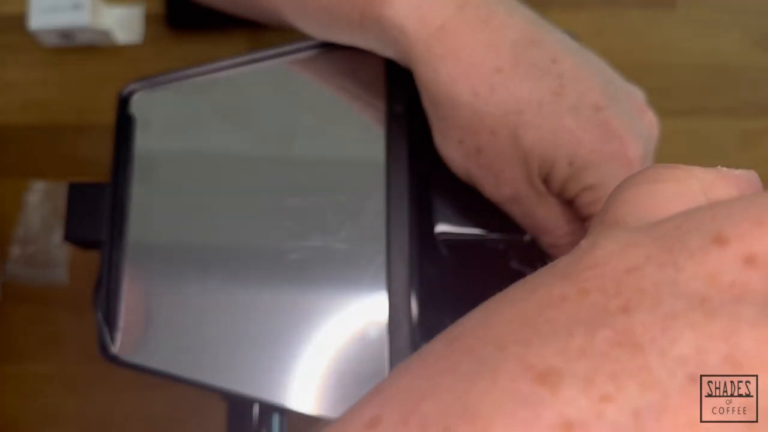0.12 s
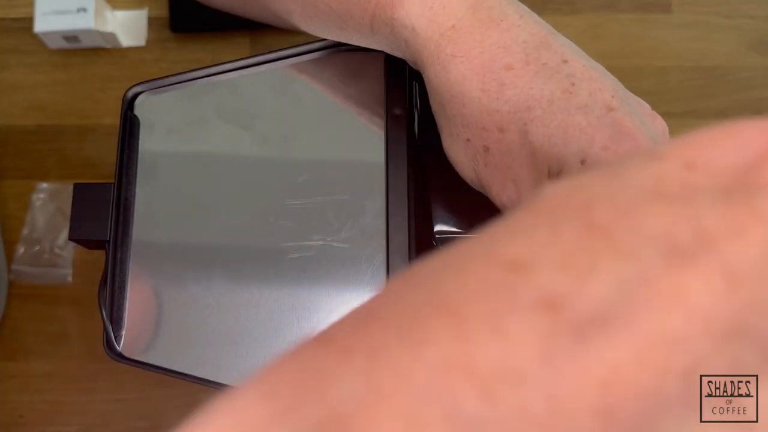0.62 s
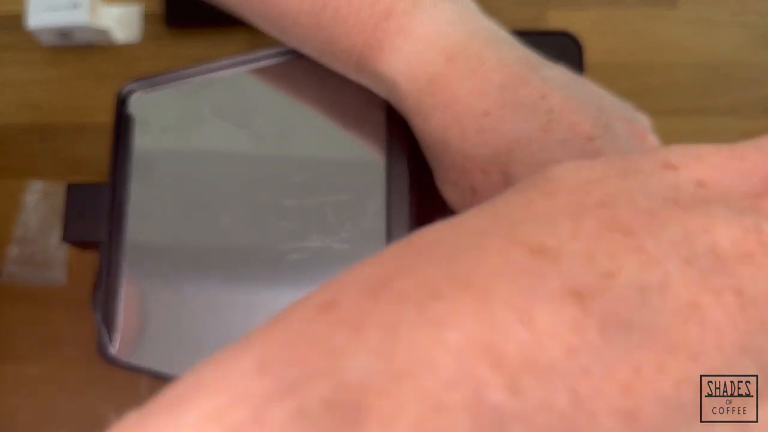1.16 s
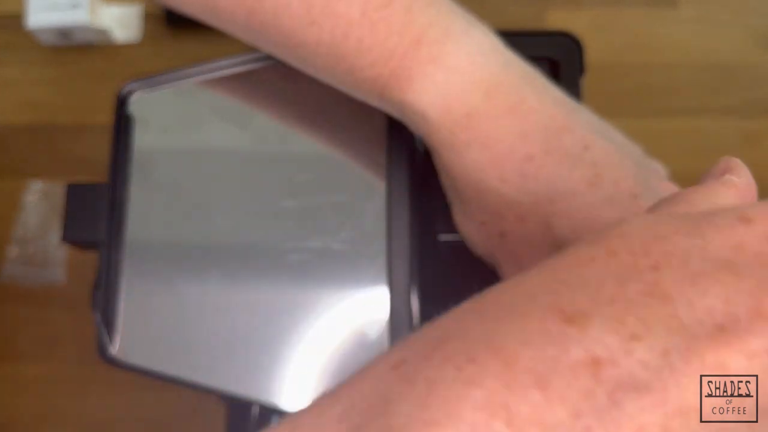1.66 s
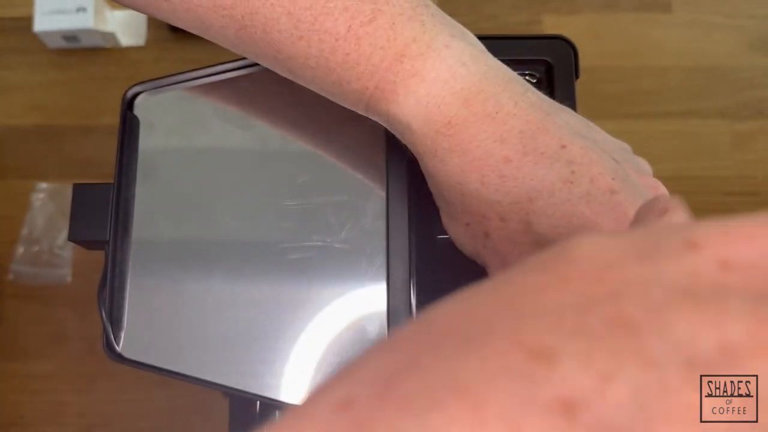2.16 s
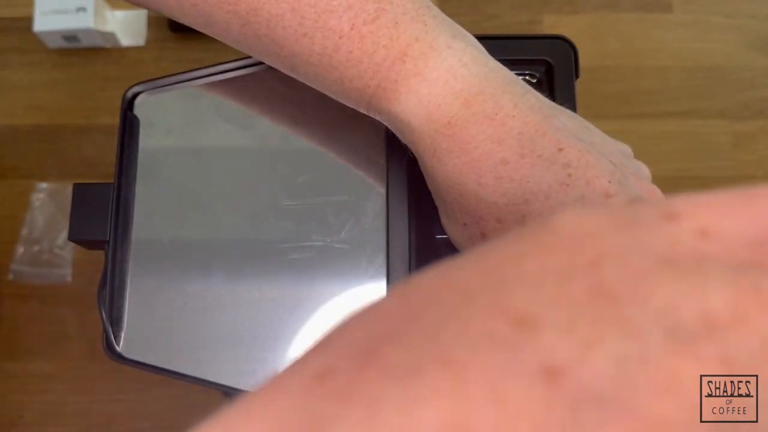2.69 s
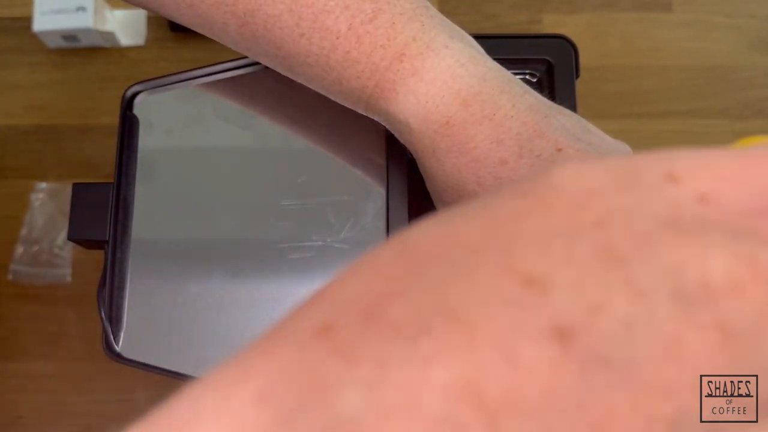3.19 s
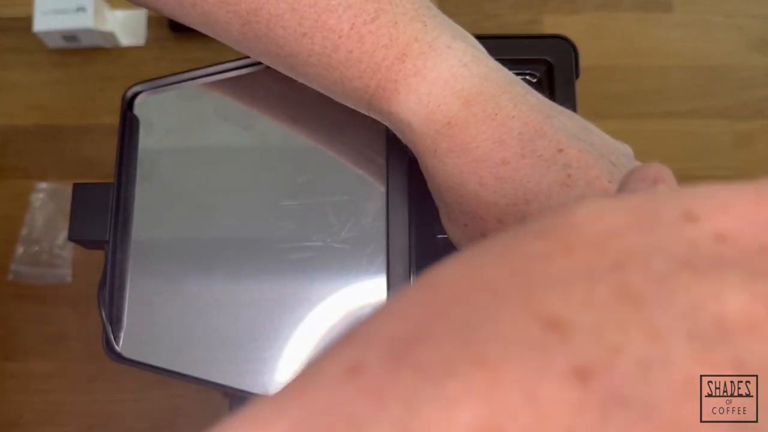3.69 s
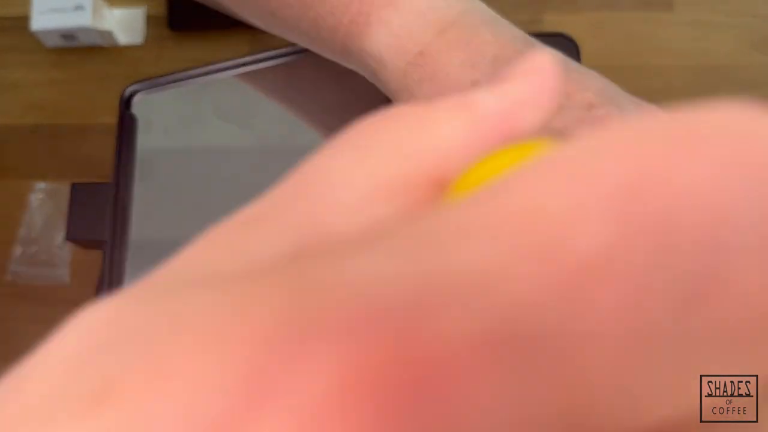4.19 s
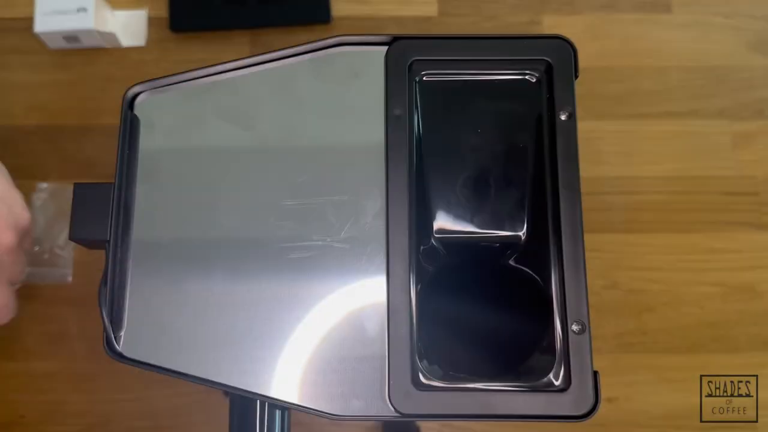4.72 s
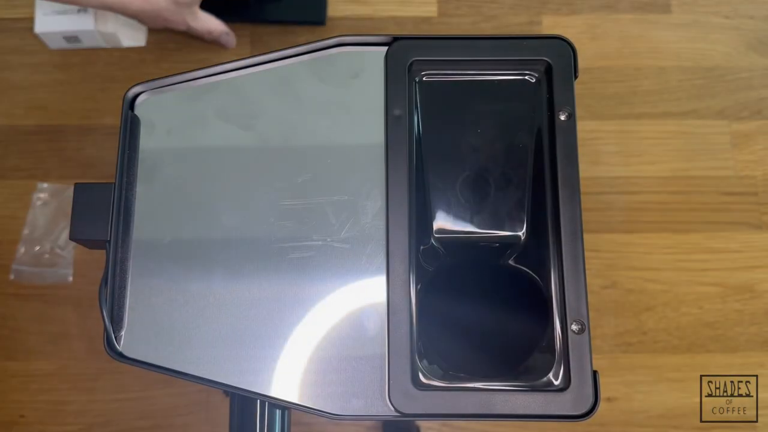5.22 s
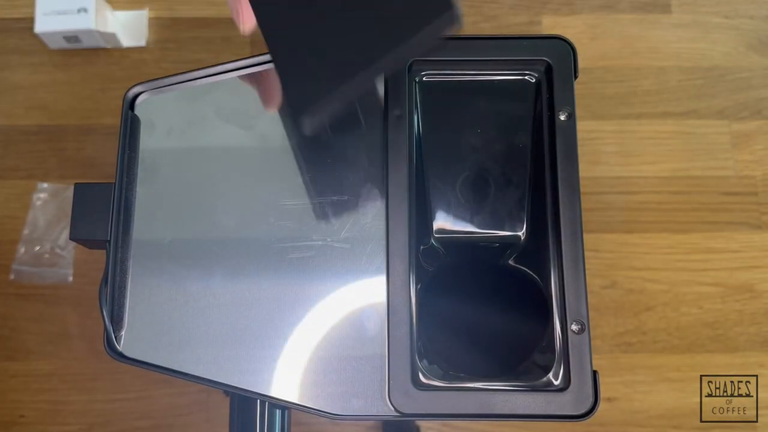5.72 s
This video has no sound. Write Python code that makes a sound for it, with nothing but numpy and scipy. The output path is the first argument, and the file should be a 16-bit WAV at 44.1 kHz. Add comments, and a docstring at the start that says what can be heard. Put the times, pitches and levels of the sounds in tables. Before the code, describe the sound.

Several sharp hollow metallic knocks, then soft rhythmic scraping of a screw being turned in a metal casing, ending with a loud knock and a tray clack.

```python
"""Hands turn a screwdriver inside a hollow metal casing: each twist is random clicks, coloured or ringing in metal.
The bit slips and knocks the casing: each knock is a tick of noise, fading tones and dying noise.
Fingers and cloth hiss as shaped noise, and the wooden table rumbles under arms and blows.
Near the end a plastic tray scrapes along, clacks and scrapes again, made of clicks and fading tones.
A small stereo microphone is close by; a small room rings after each sound, over quiet air noise."""
import sys
import numpy as np
from scipy import signal
from scipy.fft import rfft, irfft, next_fast_len
from scipy.io import wavfile

SR = 44100
rng = np.random.default_rng(int(sys.argv[2]) if len(sys.argv) > 2 else 0)


def convert_level_to_amplitude(level_db):
    """Map a level in decibels to its linear amplitude factor."""
    exponent = np.asarray(level_db, float) / 20
    return 10 ** exponent


def wav_record(signal):
    """Record a signal, one row per channel, as 16-bit PCM in the file named by sys.argv[1]."""
    frames = np.transpose(np.atleast_2d(signal))
    bounded = np.clip(frames, -1, 1)
    # unit amplitude maps onto the largest positive 16-bit level
    quanta = np.round(bounded * 32767).astype(np.int16)
    wavfile.write(sys.argv[1], SR, quanta)


N = 258406  # length [samples]


def evened(x):
    """Scales a sound to an rms of 1."""
    return x / np.sqrt(np.mean(x ** 2) + 1e-20)


def read(points, hz):
    """Reads a table between its points, on a log-frequency axis."""
    f, value = np.transpose(points)
    return np.interp(np.log(hz + 1), np.log(f + 1), value)


def curve(tables, column):
    """Gain over time from one dB column of tables joined end to end, silent before and after."""
    rows = np.vstack(tables)
    return convert_level_to_amplitude(np.interp(np.arange(N) / SR, rows[:, 0], rows[:, column], -140, -140))


def add(mix, s, sound):
    """Lays a sound into the mix at s seconds."""
    part = mix[round(s * SR):][:len(sound)]
    part += sound[:len(part)]


def coloured(x, spectrum):
    """Makes each frequency louder or softer, as a table says."""
    size = next_fast_len(len(x), True)
    gain = convert_level_to_amplitude(read(spectrum, np.fft.rfftfreq(size, 1 / SR)))
    return irfft(rfft(x, size) * gain, size)[:len(x)]


def ring(modes, rise_ms):
    """One blow: the object's tones swell during contact, then fade; the spot struck sets the mix; peak 1."""
    hz, db, t60 = np.transpose(modes)[:, :, None]
    t = np.arange(SR // 4) / SR
    spot, grip, turn = rng.standard_normal((3, len(modes), 1))
    hz = hz * (1 + .01 * grip)  # each blow is a little out of tune, as under a gripping hand
    db = db + 2 * spot
    tones = convert_level_to_amplitude(db - 60 * t / t60) * np.sin(2 * np.pi * (hz * t + 0.13 * turn))
    out = tones.sum(0) * (1 - np.exp(-(t * 1000 / rise_ms) ** 2))
    return out / abs(out).max()


def shudder(spectrum, t60, rise_ms):
    """Too many small tones to count: coloured noise that swells and dies away; peak 1."""
    t = np.arange(SR // 4) / SR
    out = coloured(rng.standard_normal(len(t)), spectrum)
    out *= convert_level_to_amplitude(-60 * t / t60) * (1 - np.exp(-(t * 1000 / rise_ms) ** 2))
    return out / abs(out).max()


def grit(per_s, spread_db):
    """Two surfaces stick and slip: random clicks of uneven size."""
    size = convert_level_to_amplitude(spread_db * np.minimum(rng.exponential(1, N), 4)) * rng.choice([-1, 1], N)
    return size * (rng.random(N) < per_s / SR)


def rubbed(modes, per_s, spread_db):
    """Every stick-slip click makes the object's tones ring; rms 1."""
    hz, db, t60 = np.transpose(modes)[:, :, None]
    t = np.arange(SR // 4) / SR
    tones = convert_level_to_amplitude(db - 60 * t / t60) * np.sin(2 * np.pi * (hz * t + rng.random(hz.shape)))
    return evened(signal.oaconvolve(grit(per_s, spread_db), tones.sum(0))[:N])


STROKE_DROP_DB = -31.5  # change from the peak to one rise before it or one fall after it


def strokes(s, rise, fall, db, flat):
    """Gain over time of strokes that swell and fade; higher flat = flatter top, steeper sides."""
    s, rise, fall, db = (np.reshape(column, (-1, 1)) for column in (s, rise, fall, db))
    t = np.arange(0, N + 64, 64) / SR - s
    away = abs(t) / np.maximum(np.where(t < 0, rise, fall), .003)
    power = convert_level_to_amplitude(db + STROKE_DROP_DB * away ** flat) ** 2
    return np.interp(np.arange(N) / 64, np.arange(t.shape[1]), np.sqrt(power.sum(0)))


# how loud hard contact is at each pitch: (frequency [Hz], level per Hz [dB])
TICK_COLOUR = [(1500, -35), (2800, 8), (4300, 2.5), (5000, 8.5), (8500, 3.5), (10500, -8.5), (12500, -17.5),
               (14500, -17), (16300, -33.5), (17000, -61.5)]
BRIGHTER_DB_PER_DB, PLAIN_TICK_DB = 2.85, -8.5  # dB per octave for each dB above a plain tick


def tick(ms, db):
    """A snap and a burst of hard contact, peak db; louder ticks are brighter."""
    t = np.arange(1024) / SR
    burst = rng.standard_normal(1024)
    burst[24] = 8.5  # the first contact stands out
    tilt_db = BRIGHTER_DB_PER_DB * max(db - PLAIN_TICK_DB, 0)
    out = coloured(burst, TICK_COLOUR)
    out = coloured(out, [(4000, 0), (16000, 2 * tilt_db)])  # two octaves of tilt
    out *= np.exp(-t * 1000 / ms) * np.minimum(t * 3000, 1)
    return convert_level_to_amplitude(db) * out / abs(out).max()


# colour of the quiet room noise: (frequency [Hz], level per Hz [dB])
AIR_COLOUR = [(18, -35.5), (30, -9), (91, -1.5), (201, -0.5), (1030, -5.5), (1530, -13), (3380, -15),
              (4900, -19), (5350, -16), (5900, -18.5), (7880, -28.5), (10800, -76.5), (15200, -60),
              (16500, -31.5)]
AIR_DB = -66.5  # rms


def air():
    """Quiet room noise, mostly the same at both microphone ports."""
    common, left, right = (coloured(z, AIR_COLOUR) for z in rng.standard_normal((3, N)))
    return convert_level_to_amplitude(AIR_DB) * evened(common + 0.5 * np.array([left, right]))


# how long the room rings: (frequency [Hz], time to fall by 60 dB [s])
ROOM_DECAY = [(100, 0.33), (300, 0.48), (1000, 0.57), (3000, 0.7), (6000, 0.59), (10000, 0.31)]


def room(x):
    """Small echoes die away, each band at its own speed; three random tails take turns for a smoother fade."""
    out = np.zeros((2, N))
    angle = np.pi * np.arange(N) / SR
    low = signal.filtfilt(*signal.butter(4, 3300, fs=SR), x)
    for k in range(3):
        # one echo of random sign in every 10 samples
        taps = np.zeros((2, SR))
        at = np.arange(400, SR - 10, 10) + rng.integers(0, 10, (2, (SR - 401) // 10))
        np.put_along_axis(taps, at, rng.choice([-1., 1.], at.shape), 1)
        taps = taps[0] + 0.5 * taps[1] * np.array([[1], [-1]])  # close ports hear nearly the same room
        hz, t, z = signal.stft(taps, SR, nperseg=256)
        fade = convert_level_to_amplitude(-60 * t / read(ROOM_DECAY, hz)[:, None])
        tail = signal.istft(z * fade, SR, nperseg=256)[1]
        # the treble swaps tails much faster, which gives it a smooth, even tail
        slow, quick = np.sqrt(2 / 3) * np.cos(angle / [[.05], [.003]] + k * np.pi / 3)
        sent = slow * low + quick * (x - low)
        out += signal.fftconvolve(sent[None], tail / np.linalg.norm(tail[0]), axes=1)[:, :N]
    return out


# colour of the table's rumble: (frequency [Hz], level per Hz [dB])
RUMBLE = [(20, -32.5), (45, 10), (70, 13.5), (110, 7.5), (150, 11.5), (220, -43.5)]
# the table rumbling under leaning arms: (time [s], level [dB])
LEAN = [(0.0, -59.5), (0.55, -58), (0.98, -62.5), (1.71, -68), (2.04, -61), (2.76, -62.5), (3.15, -61),
        (3.95, -58.5), (4.13, -62.5), (4.31, -68), (4.96, -75.5), (5.09, -74.5), (5.24, -55), (5.37, -52.5),
        (5.5, -75), (5.86, -78)]
LUMPY_DB, LUMP_S = 3, .04  # the rumble comes in lumps: rms swing, smoothing length
# a blow reaches the table: thud dB = THUD_DB + THUD_SHARE x blow dB
THUD_DB, THUD_SHARE, THUD_RISE_S, THUD_FALL_S, THUD_FLAT = -38.5, 0.64, .025, 0.062, 1.7
BUMP_THUD_DB = -4  # rumble under a wrist bump, over the bump's peak


def table_rumble():
    """Low noise: lumpy under the arms, with a thud after every knock, tray hit and wrist bump."""
    s, db = np.transpose([row[:2] for row in KNOCKS + TRAY_HITS])
    thuds = strokes(s + THUD_RISE_S, THUD_RISE_S, THUD_FALL_S, THUD_DB + THUD_SHARE * db, THUD_FLAT)
    s, db = np.transpose(BUMPS)
    thuds += strokes(s + THUD_RISE_S, THUD_RISE_S, THUD_FALL_S, BUMP_THUD_DB + db, THUD_FLAT)
    window = np.hanning(round(LUMP_S * SR))
    lumps = evened(signal.oaconvolve(rng.standard_normal(N), window, "same"))
    lean = curve([LEAN], column=1) * convert_level_to_amplitude(LUMPY_DB * lumps)
    return (lean + thuds) * evened(coloured(rng.standard_normal(N), RUMBLE))


# tones of the table top: (frequency [Hz], level [dB], time to fall by 60 dB [s])
TABLE_TOP = [(98, -9.5, 0.03), (119, -3, .08), (172, -7.5, 0.1)]
# a wrist bumps the table: (time [s], peak level [dB])
BUMPS = [(1.196, -39), (2.115, -54.5), (2.662, -53), (3.212, -51), (3.759, -45.5), (4.925, -53)]


def wrist_bumps():
    """A soft blow makes the table top ring in a few low tones."""
    out = np.zeros(N)
    for s, db in BUMPS:
        add(out, s, convert_level_to_amplitude(db) * ring(TABLE_TOP, rise_ms=11))
    return out


# tones of the tray's base, of its rim, and those woken by sliding:
# (frequency [Hz], level [dB], time to fall by 60 dB [s])
TRAY_BASE = [(108, -16, 0.02), (264, 8, 0.027), (318.5, -3, 0.2), (377.5, 10.5, 0.094), (455, 6.5, 0.033),
             (536, 5, 0.04), (650, -3, 0.044), (702, 13, 0.0075), (760, 8, 0.021), (936, -21, 0.05),
             (1100, -7, 0.043), (1085, 7, 0.02), (1277, -1.5, 0.12), (1490, 2, 0.0585), (1536, 3.5, 0.024)]
TRAY_RIM = [(1714, 1, 0.027), (1880, -5, 0.011), (1810, 21, 0.01), (2110, 0.5, 0.015), (2130, -21, 0.013),
            (2585, -2, 0.025), (2440, 3, 0.019), (2740, -14, 0.037), (2910, -2.5, 0.03), (3650, -9, 0.04),
            (3830, -7, 0.047), (4290, -8, 0.038), (6300, 0, 0.014)]
TRAY_SQUEAK = [(1394, -10.5, .03), (1695, -3, 0.044), (2100, -6.5, 0.098), (2750, -2, 0.03),
               (2760, 0.5, 0.04), (4040, -8, 0.023)]
# colours of the tray and table shuddering after a hit, and of the scraping rim:
# (frequency [Hz], level per Hz [dB])
TRAY_SHAKE = [(47, -41), (80, -4), (167, -14.5), (228, 3.5), (292, -10), (367, -1), (484, -9), (1120, -12),
              (4000, -38.5), (5200, -73), (8800, -120)]
TRAY_SCRAPE = [(710, -52.5), (1200, -35), (1360, 1), (1680, 12), (1820, 4), (2370, 3.5), (2800, 7),
               (3230, -5.5), (4230, -7), (5000, 0), (6500, -52), (11000, -120)]
# the tray dragged, one part before the clack and one after: (time [s], base level [dB], rim level [dB])
SLIDE = [
    [(4.79, -74, -84.5), (4.812, -65, -77), (4.912, -66.5, -80), (4.954, -57.5, -73.5), (5.0, -70.5, -70.5),
     (5.03, -58.5, -67.5), (5.178, -58.5, -61.5), (5.19, -53, -54)],
    [(5.45, -50.5, -77.5), (5.534, -58.5, -85), (5.612, -58.5, -76), (5.734, -55, -70), (5.8, -60.5, -69),
     (5.824, -55, -74), (5.86, -61.5, -70)],
]
# the tray touching the table: (time [s], base level [dB], rim over base [dB], crack over base [dB])
TRAY_HITS = [(5.183, -37.5, -3, -13), (5.205, -33, 12.5, 14), (5.214, -44, 20, 19), (5.254, -43, 15, 19),
             (5.281, -10, -6, -18), (5.299, -15.5, -31.5, -13.5), (5.365, -20, -39, -28)]


def tray():
    """Stick-slip clicks drag the tray over the wood; hits make base and rim ring, with a crack."""
    out = curve(SLIDE, column=1) * rubbed(TRAY_BASE, 1100, 4.1)
    out += curve(SLIDE, column=2) * evened(coloured(grit(2200, 2.3), TRAY_SCRAPE))
    # it squeaks only while loaded, before the clack
    out += curve(SLIDE[:1], column=2) * convert_level_to_amplitude(3.0) * rubbed(TRAY_SQUEAK, 1600, 3.5)
    for s, db, rim_db, crack_db in TRAY_HITS:
        base = 0.38 * ring(TRAY_BASE, rise_ms=1.7) + 0.62 * shudder(TRAY_SHAKE, 0.22, rise_ms=4.5)
        add(out, s, convert_level_to_amplitude(db) * base)
        add(out, s, convert_level_to_amplitude(db + rim_db) * ring(TRAY_RIM, rise_ms=1.0))
        add(out, s, tick(5.8, db + crack_db))
    return out


# colour of brushing skin and cloth: (frequency [Hz], level per Hz [dB])
CLOTH = [(880, -49), (1500, -14), (3180, -15), (6800, -3), (9940, -11.5), (11200, -6), (12900, -31),
         (15100, -3), (16400, -25)]
# skin and cloth brushing past: (peak time [s], rise [s], fall [s], level [dB])
BRUSHES = [(0.847, .02, 0.045, -75), (1.766, .02, .04, -72), (2.048, 0.074, 0.13, -76.5),
           (2.32, .05, 0.11, -75), (2.59, .03, 0.025, -80), (4.25, .01, .06, -85), (4.38, .09, 0.074, -68),
           (4.559, 0.056, 0.13, -74), (4.73, 0.078, 0.061, -56.5), (5.19, .3, 0.04, -73.5),
           (5.58, 0.021, 0.022, -63.5), (5.72, 0.083, 0.11, -63.5)]
BRUSH_FLAT = 2.13


def brushes():
    """Skin and cloth brush past: dense tiny clicks blur into a hiss that swells and fades."""
    hiss = evened(coloured(grit(8000, 1.7), CLOTH))
    return strokes(*np.transpose(BRUSHES), BRUSH_FLAT) * hiss


# bare touches of the steel tip: (time [s], peak level [dB], centre frequency [Hz])
TICKS = [(0.8494, -52, 2750), (0.9527, -63, 2500), (1.1174, -73, 5640), (1.428, -62, 8000),
         (1.647, -59, 6000), (1.7649, -53.5, 5480), (2.5894, -61, 5210), (4.088, -47.5, 2500),
         (4.1294, -46.5, 2750), (4.2512, -49.5, 3200), (4.5366, -47, 2900), (4.8045, -51.5, 1500),
         (4.8668, -43, 7000), (4.9521, -51, 3000), (4.967, -55.5, 5570), (5.4194, -53, 7090)]


def tip_touches():
    """The steel tip touches lightly: a very short noise burst, each with its own brightest band."""
    out = np.zeros(N)
    for s, db, hz in TICKS:
        band = signal.iirpeak(np.clip(hz, 500, 12000), 1.2, SR)
        burst = signal.lfilter(*band, rng.standard_normal(600))
        burst *= np.exp(-np.arange(600) / SR / 0.0022)
        add(out, s, convert_level_to_amplitude(db) * burst / abs(burst).max())
    return out


# tones of the casing's parts: (frequency [Hz], level [dB], time to fall by 60 dB [s])
FLOOR_PAN = [(215.7, -2, 0.055), (248.3, -0.5, 0.087), (281, -0.5, 0.087)]
WALLS = [(310, -16, 0.57), (382.5, -8, 0.13), (398.5, 8, 0.09), (427, 0, 0.072)]
LID = [(534, -6, 0.19), (595, -6.5, 0.22), (627, -9, 0.091), (710, -17, 0.018), (735.3, 11.5, 0.062),
       (724, -2.5, 0.041), (830, -17, 0.012), (958, -20, 0.026)]
BRACKETS = [(1154, 8, 0.029), (1241, 0.5, 0.04), (1390, 6.5, 0.019), (1498, -3, 0.0094), (1614, -4, .022),
            (1823, -1.5, 0.012), (2070, -11, 0.025), (2447, -14, 0.11), (2773, -14, 0.025)]
# colours of many small lid tones, and of loose parts shaken by a blow: (frequency [Hz], level per Hz [dB])
LID_SHAKE = [(300, -43.5), (480, -0.5), (600, 1), (740, -4.5), (950, -21), (1300, -47)]
CLATTER = [(530, -35), (900, -12.5), (1340, 2.5), (1990, -8.5), (2440, -3.5), (3170, -14.5), (4500, -18),
           (5850, -45), (9900, -120)]
# blows on the casing: (time [s], lid level [dB], then levels over the lid:
# floor pan [dB], walls [dB], brackets [dB], metal tick [dB])
KNOCKS = [(0.111, -45, -25, -22, -7, -14), (0.125, -12, -8, -8, -13, -19), (0.299, -80, -16, -20, -35, -15),
          (0.313, -35, 3, -31, 6, -3), (0.322, -10.5, -11, -9, -5.5, -9.5), (0.493, -19, -1, -10, 0.5, -18),
          (0.499, -10, -10, -11.5, -8, -5), (0.627, -9, -10.5, -5.5, -9, -14.5),
          (0.845, -43, -12, -19, -16, -16), (0.911, -49, -2, -23, -6, -22),
          (0.956, -39.5, -0.5, -7, -21, -8), (1.119, -58.5, 15, 13.5, -8, 9),
          (1.192, -54, 6.5, 5.5, -17, -16), (1.382, -47, -4.5, -12, -9.5, -22),
          (1.457, -44.5, -1.5, -2, -15, -4), (1.552, -36, -11, -11.5, -9, -15.5),
          (1.77, -45, -4.5, -16, -19, -9), (1.92, -35, -14, -9.5, -21, -24), (2.042, -50, 2, -4, -6, -2.5),
          (2.111, -42, 2.5, -21, -10, -22), (2.315, -42, 4.5, -3, -14, -30),
          (2.389, -42, -29, 2.5, -32, -34), (2.405, -28, -8, -7.5, -14.5, -24),
          (2.481, -35.5, -10, -3.5, -15.5, -17), (2.574, -40.5, -4.5, -20, -32, -30),
          (2.667, -43, -6, 2, -17, -40), (2.85, -39, -7, -1, -20, -29), (2.948, -33.5, -0.5, 0.5, -18, -38),
          (3.119, -32, -3.5, 6, -15, -46), (3.201, -38.5, -3, -5.5, -10.5, -31),
          (3.222, -37.5, -1.5, -2.5, -8.5, -38), (3.406, -35.5, 2, 6.5, -13.5, -26),
          (3.484, -28, -5.5, -9, -23, -31), (3.654, -41, 1, 4, -18, -30),
          (3.75, -51, 11.5, 11.5, -19.5, -24), (3.816, -25.5, -14, 9, -14.5, -17.5),
          (3.826, -20, -14, -4, -0.5, -3.5), (3.849, -2.5, -16, -10.5, -14, -6.5)]
PALM_MS = 42.7  # the palm settles back on the broad panels and stills them


def knocks():
    """The bit slips and hits the casing: a tick first, then lid and brackets; broad panels swell later."""
    out = np.zeros(N)
    palm = np.exp(-(np.arange(SR // 4) * 1000 / SR / PALM_MS) ** 4)
    for s, db, pan_db, walls_db, brackets_db, tick_db in KNOCKS:
        add(out, s, convert_level_to_amplitude(db + pan_db) * palm * ring(FLOOR_PAN, rise_ms=15))
        add(out, s, convert_level_to_amplitude(db + walls_db) * palm * ring(WALLS, rise_ms=12.0))
        lid = 0.6 * ring(LID, rise_ms=0.97) + 0.86 * shudder(LID_SHAKE, 0.016, rise_ms=4.5)
        add(out, s, convert_level_to_amplitude(db) * lid)
        brackets = 1.36 * ring(BRACKETS, rise_ms=0.53) + 0.47 * shudder(CLATTER, 0.12, rise_ms=2.5)
        add(out, s, convert_level_to_amplitude(db + brackets_db) * brackets)
        add(out, s, tick(8.6, db + tick_db))
    return out


# colours of the scraping thread and of the sliding fingers: (frequency [Hz], level per Hz [dB])
SCRAPE = [(290, -31.5), (500, 6), (728, -6), (917, -8), (1290, -2.5), (1900, -12.5), (2400, -7),
          (2750, -28), (5000, -24), (6500, -53), (11000, -120)]
SKIN = [(1500, -21), (3000, -8.5), (6150, 5), (8000, -7), (10400, -3.5), (12300, -13), (14500, -10.5),
        (16300, 1), (17000, -54)]
# the casing humming under the grip: (time [s], level [dB])
BOOM = [(0.0, -48), (0.3, -59), (0.45, -52), (0.6, -40), (0.75, -65.5), (1.15, -59.5), (1.87, -58),
        (2.69, -57.5), (2.84, -59), (2.96, -56), (3.1, -70.5), (3.24, -50), (3.35, -59.5), (3.77, -58),
        (3.98, -44), (4.18, -56.5), (4.3, -67)]
# each twist of the screw: (peak time [s], rise [s], fall [s], scrape level [dB], skin hiss level [dB])
TWISTS = [(0.0, .05, 0.45, -59, -64), (0.952, 0.026, .13, -51, -70), (1.124, 0.025, 0.057, -56.5, -73),
          (1.296, 0.051, 0.095, -51.5, -75.5), (1.47, 0.083, 0.17, -61.5, -65),
          (1.628, .05, 0.054, -50, -70.5), (1.91, 0.03, .09, -53, -68.5), (2.17, 0.041, 0.12, -52, -65.5),
          (2.45, 0.072, 0.06, -53.5, -65), (2.73, 0.06, 0.088, -53, -69), (3.012, 0.068, 0.048, -49, -64.5),
          (3.28, 0.048, 0.1, -53.5, -69), (3.486, .02, 0.024, -47.5, -72.5),
          (3.552, 0.093, 0.046, -52.5, -68), (3.76, 0.29, 0.19, -62, -77.5), (4.12, 0.15, .14, -58.5, -67)]
TWIST_FLAT, SKIN_LAG_S = 1.69, .01


def screw_twists():
    """Thread friction shakes the casing and scrapes in strokes; sliding skin hisses just after."""
    boom = rubbed(FLOOR_PAN, 280, 5.2)
    boom += convert_level_to_amplitude(-2.5) * rubbed(WALLS, 200, 2.0)
    boom += convert_level_to_amplitude(-7.0) * rubbed(LID, 490, 11.0)
    scrape = evened(coloured(grit(5600, 7.1), SCRAPE))
    scrape += convert_level_to_amplitude(3.0) * rubbed(BRACKETS, 640, 2.4)
    scrape += convert_level_to_amplitude(6.5) * rubbed(LID, 630, 1.5)
    hiss = evened(coloured(grit(6000, 1.8), SKIN))
    s, rise, fall, scrape_db, hiss_db = np.transpose(TWISTS)
    out = curve([BOOM], column=1) * evened(boom)
    out += strokes(s, rise, fall, scrape_db, TWIST_FLAT) * evened(scrape)
    return out + strokes(s + SKIN_LAG_S, rise, fall, hiss_db, TWIST_FLAT) * hiss


# echoes from the table and the near wall: (delay [s], level [dB])
ECHOES = [(.0045, -39.5), (.011, -25.5)]
SLAP_S, SLAP_DB, SLAP_HZ = .025, -16, 900  # the far wall sends back a dull slap
# what reaches the walls differs from what points at the microphone: (frequency [Hz], level [dB])
ROOM_COLOUR = [(60, -8), (250, 2.5), (400, -3.5), (720, -4), (1300, 0), (3000, 2.5), (6000, 0.5),
               (10000, 2.5)]


def scene():
    """Direct sound, early echoes, room tail and air."""
    near = table_rumble() + wrist_bumps() + tray() + brushes() + tip_touches() + knocks() + screw_twists()
    early = near.copy()
    for s, db in ECHOES:
        add(early, s, convert_level_to_amplitude(db) * near)
    dull = signal.lfilter(*signal.butter(2, SLAP_HZ, fs=SR), near)
    add(early, SLAP_S, convert_level_to_amplitude(SLAP_DB) * dull)
    return early + convert_level_to_amplitude(-10.5) * room(coloured(near, ROOM_COLOUR)) + air()


def band_limit(x):
    """A steep low-pass at the top of the band."""
    return signal.sosfilt(signal.butter(12, 16650, fs=SR, output="sos"), x)


# how far the left microphone port leads the right: (frequency [Hz], phase [radians])
LEAD = [(20, 0), (260, 0), (780, -.9), (1290, .3), (4900, .4), (6460, -.9), (9560, -2.1), (11000, -2.8),
        (13600, -3.3), (15000, -4.1)]
# how much louder the left port is than the right: (frequency [Hz], level [dB])
LOUDER = [(30, .7), (90, 1.1), (180, 3.7), (350, 4.4), (750, 4.7), (1300, .3), (16000, .1)]


def record(dry):
    """The two microphone ports differ in level and phase; soft limiting keeps the loudest peaks in range."""
    size = next_fast_len(N, True)
    hz = np.fft.rfftfreq(size, 1 / SR)
    half = convert_level_to_amplitude(read(LOUDER, hz) / 2) * np.exp(.5j * read(LEAD, hz))  # half the difference to each port
    ports = irfft(rfft(dry, size, axis=1) * np.array([half, 1 / half]), size, axis=1)[:, :N]
    ports = np.tanh(ports / 1.1) * 1.1  # soft limiting
    return band_limit(ports)


dry = scene()
out = record(dry)
wav_record(out)
```